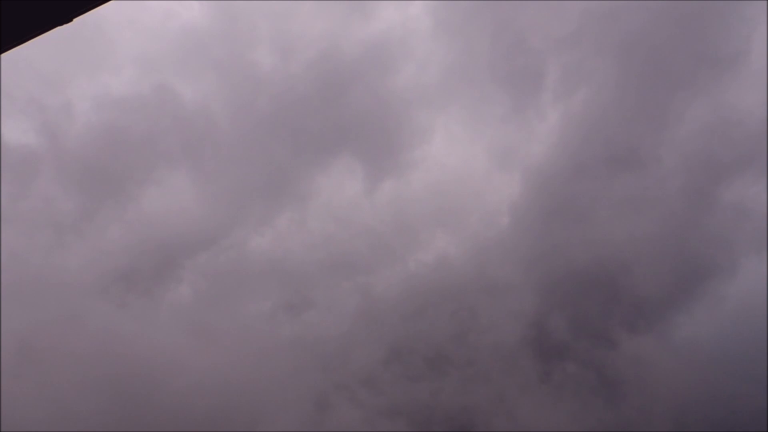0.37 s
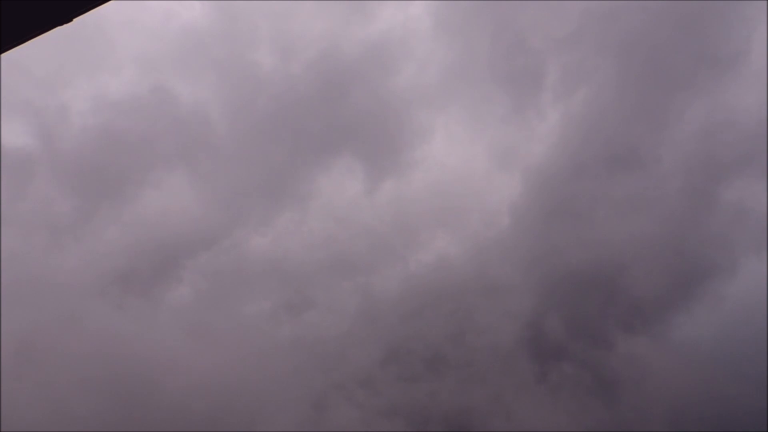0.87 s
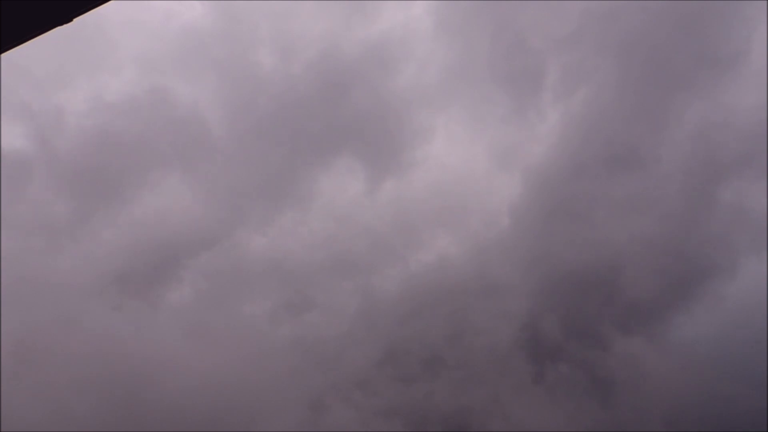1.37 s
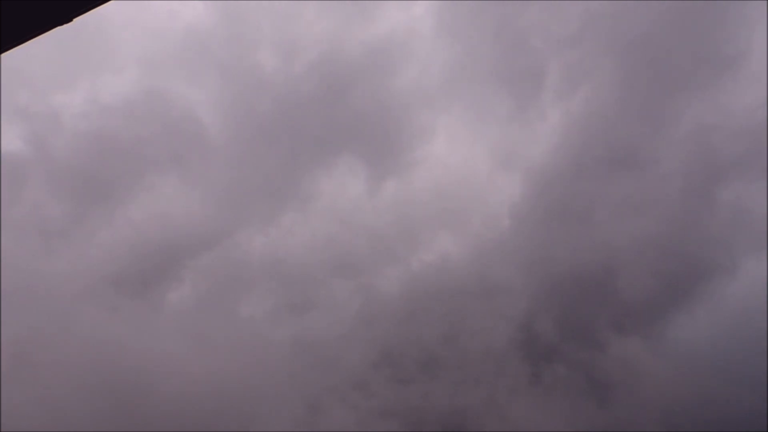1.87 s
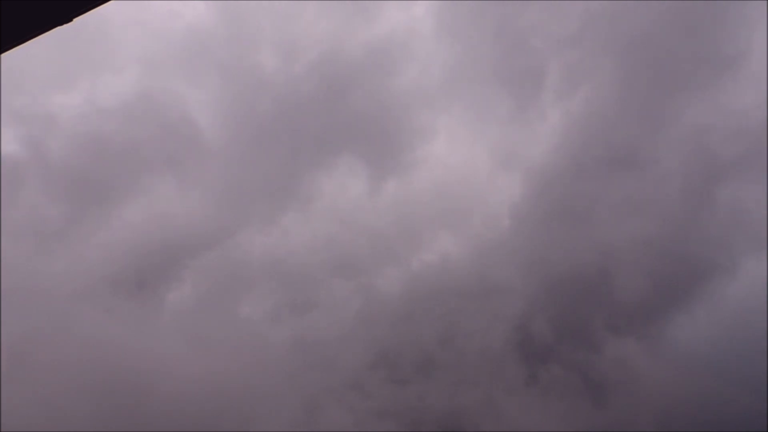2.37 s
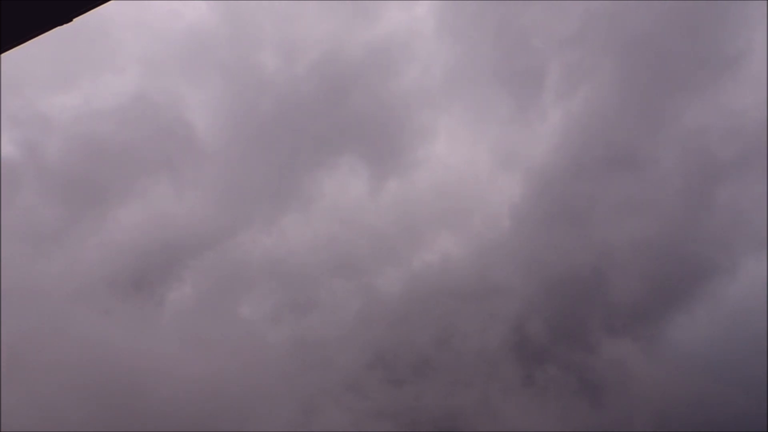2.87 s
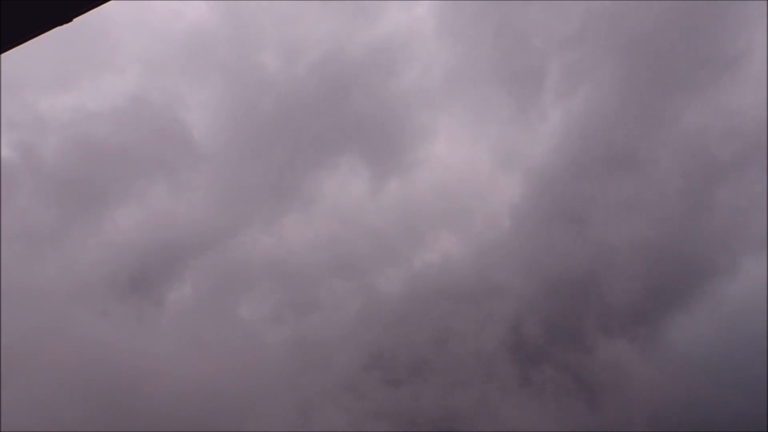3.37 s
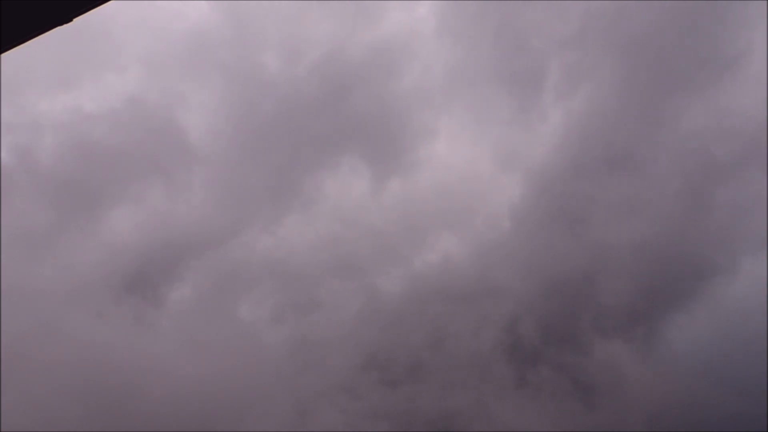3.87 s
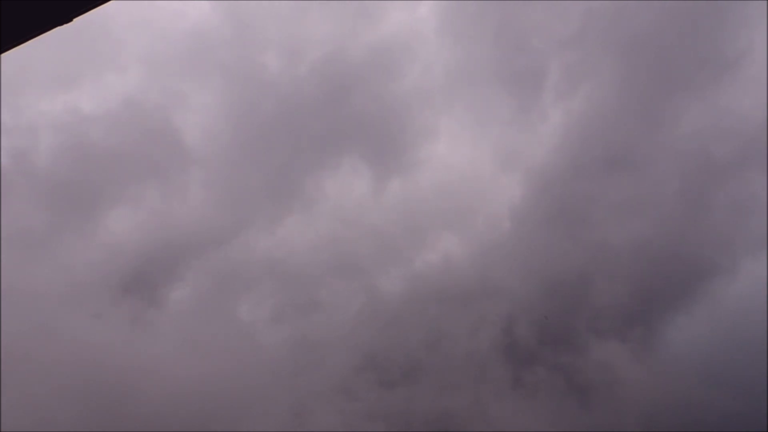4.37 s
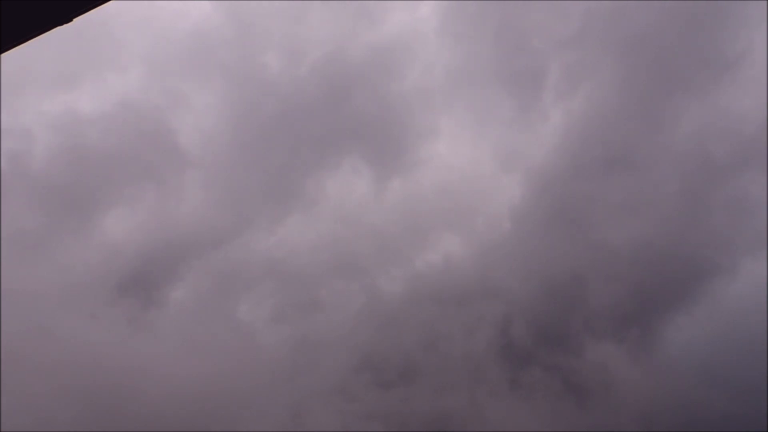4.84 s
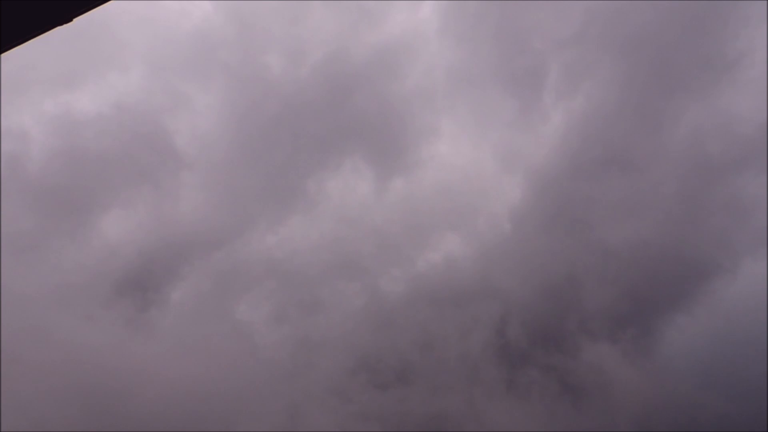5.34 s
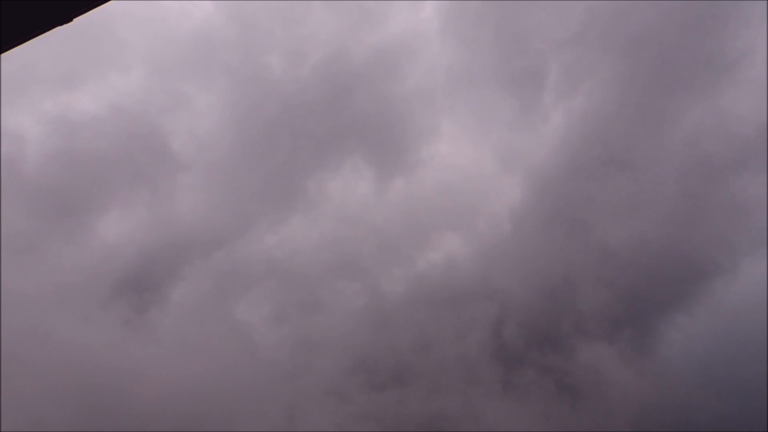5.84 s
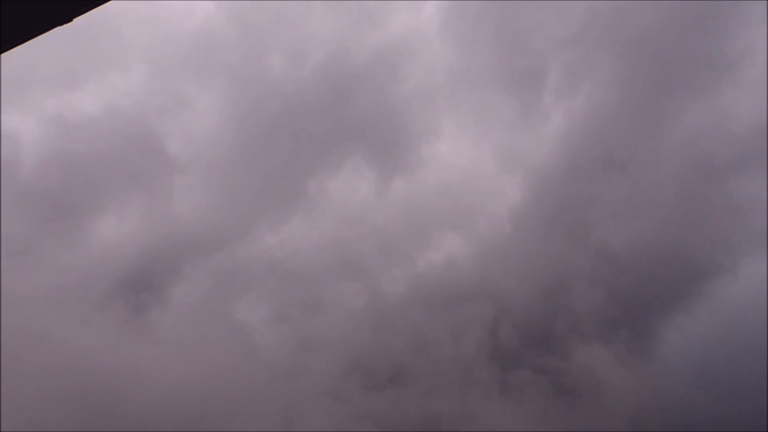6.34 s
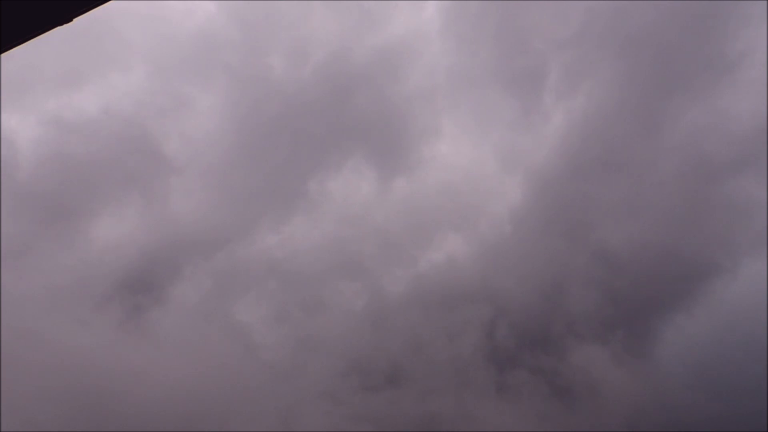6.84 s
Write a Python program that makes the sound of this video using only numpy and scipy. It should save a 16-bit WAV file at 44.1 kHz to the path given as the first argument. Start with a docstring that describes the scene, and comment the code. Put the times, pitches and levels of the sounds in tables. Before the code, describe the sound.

Outdoors in a storm, overloaded low thunder thumps and tumbles, fading and returning, over a steady rain hiss with sharp nearby drop ticks and small splashes.

```python
"""Open ground: thunder claps and rolls while rain falls steadily all around. Shock pulses from the long
lightning channel, filtered in bands, pile up into the roll; N-waves give the thumps. Banded noise, clicks and
damped resonators make the rain; single big drops tick and splash close by. The rain bed dips for a while from
0.26 s and again from 1.75 s; the loudest claps overload the recorder."""
import sys
import numpy as np
from scipy import signal
from scipy.io import wavfile
from scipy.ndimage import uniform_filter1d

SR = 44100
rng = np.random.default_rng(int(sys.argv[2]) if len(sys.argv) > 2 else 0)


def transcribe(signal):
    """Save signal, clipped to [-1, 1], as a 16-bit WAV file at the path in sys.argv[1]."""
    frames = np.atleast_2d(signal).T
    limited = np.clip(frames, -1, 1)
    pcm = np.round(limited * 32767).astype(np.int16)
    wavfile.write(sys.argv[1], SR, pcm)


def invert_db(level):
    """Linear amplitude ratio for a level in decibels (20 dB per decade), elementwise."""
    return 10 ** (np.asarray(level, dtype=float) / 20)


N = 318402

# rumble between the claps: t/s, body level/dB, boom level above body/dB, rasp level above body/dB
RUMBLE = [(0.0, -20, 3.5, -18.5), (0.2, -24.5, -13, -7), (0.3, -25, 4, -16.5), (0.6, -34, 7, -16.5),
          (0.88, -28, -2.5, -15.5), (1.02, -20, -1.5, -12.5), (1.5, -19, -3.5, -18), (1.78, -21, -4, -19),
          (2.0, -26.5, 3.5, -17), (2.55, -26, -6, -16.5), (3.3, -25, -2.5, -18.5), (4.3, -28, -5.5, -17),
          (4.85, -35, -2.5, -16.5), (5.55, -33.5, -14, -13.5), (5.75, -23, -12, -20.5), (6.2, -23, -8, -21),
          (6.55, -26, -3.5, -20), (6.78, -28.5, -3.5, -23.5), (7.0, -24, -3, -19.5), (7.22, -27.5, -7, -22)]
# claps swelling out of the rumble: t/s, body level at the top/dB, boom level above body/dB,
# full width at half power/s
CLAP_SWELLS = [(0.192, -13, 8.5, 0.077), (1.046, -20, 0, 0.049), (1.13, -14.5, -7, 0.03),
               (1.26, -20.5, 1, 0.067), (1.437, -16, -2, 0.036), (1.635, -16, 4, 0.053),
               (1.699, -12, 3, 0.038), (1.842, -18, 0.5, 0.07), (2.056, -35, 8, 0.035),
               (2.28, -25, 3, 0.064), (2.493, -18, -5, 0.094), (2.623, -21, -13, 0.074),
               (2.814, -21, -6, 0.043), (3.216, -27.5, -0.5, 0.046), (3.336, -23, -22, 0.094),
               (3.754, -28, 1, 0.11), (4.166, -32, -10, 0.04), (4.352, -26, 3, 0.055),
               (5.126, -35, 1, 0.026), (5.312, -36.5, -0.5, 0.077), (5.537, -29, -0.5, 0.055),
               (5.699, -19.5, -5, 0.026), (6.12, -20, -8, 0.15), (6.372, -26, 5.5, 0.061),
               (6.651, -20.5, 3, 0.019), (6.905, -28, -3, 0.074), (7.127, -24, 6, 0.077)]
# spectral density of the thunder, relative within each layer: f/Hz, level per hertz/dB
THUNDER_SPECTRUM = [(13, -39), (22, -3), (69, 2), (108, -2.5), (151, 2), (190, -4.5), (261, -3),
                    (385, -9.5), (459, -30.5), (568, -4), (642, -34), (808, -20), (915, -41.5),
                    (1190, -48.5), (1500, -26), (1950, -74), (3300, -120)]
# rain bed, lower for a while from 0.26 s and from 1.75 s: t/s, level/dB
RAIN_LEVEL = [(0.0, -44.5), (0.21, -42.5), (0.26, -49.5), (0.55, -50.5), (0.82, -44.5), (1.0, -40.5),
              (1.5, -36), (1.75, -44), (2.05, -47), (2.4, -38), (2.7, -39.5), (4.3, -38.5), (7.22, -39)]
# relative spectral density of the rain: f/Hz, level per hertz/dB
RAIN_SPECTRUM = [(300, -1), (800, 4), (1250, 0), (1700, 2), (2200, -0.5), (3500, -2), (6500, -3),
                 (9300, -5.5), (12000, -4.5), (13600, -8)]
# left-right correlation of the rain: f/Hz, likeness (1 = identical)
RAIN_CORRELATION = [(400, 0.11), (1000, 0.5), (2000, -0.08), (4000, -0.38), (12000, -0.063)]
# near drops: t/s, tick peak level before the crack is added/dB, tick centre f/Hz,
# spray level above the tick/dB, spray t60/s
NEAR_DROPS = [(0.085, -36, 8900, -15, 0.22), (0.4483, -36.5, 8800, -16, 0.3),
              (0.838, -41.5, 2900, -10, 0.22), (0.9185, -34.5, 2800, -13, 0.13),
              (1.089, -31, 9510, -10.5, 0.46), (1.124, -38, 6150, -4, 0.25), (1.137, -25, 8500, -22, 0.15),
              (1.1496, -21, 10100, -16, 0.33), (1.344, -28, 2910, -10, 0.21), (1.366, -25, 6510, -23, 0.22),
              (1.372, -25, 6680, -16, 0.25), (1.3805, -16, 6900, -13, 0.24), (1.4218, -19, 6690, -14, 0.16),
              (1.431, -8.5, 6550, -25, 0.29), (1.4594, -30, 6570, -22, 0.24),
              (2.4303, -25, 9300, -22, 0.62), (2.918, -16.5, 9900, -24, 0.56),
              (3.053, -22, 8450, -22, 0.33), (3.4513, -27, 6800, -21, 0.6), (3.706, -22, 9200, -16.5, 0.42),
              (3.923, -29, 4800, -18, 0.22), (3.9938, -24, 7350, -22, 0.24),
              (4.0603, -29.5, 11400, -6, 0.1), (4.0857, -17.5, 10700, -15.5, 0.2),
              (4.1238, -28.5, 6960, -12, 0.25), (4.147, -22, 7050, -20, 0.26),
              (4.1524, -27, 10700, -20, 0.56), (4.2186, -29, 6800, -11.5, 0.37),
              (4.3, -27, 6390, -25, 0.17), (4.408, -30, 11500, -11, 0.17), (4.416, -17.5, 11700, -16, 0.21),
              (4.497, -19, 9300, -22, 0.33), (4.9221, -21.5, 2950, -13.5, 0.27),
              (4.928, -17.5, 5000, -21, 0.37), (4.982, -29, 7260, -14.5, 0.22),
              (5.0838, -30, 13200, -21, 0.22), (5.1548, -14, 8100, -22, 0.12),
              (5.1751, -14, 7020, -23, 0.33), (5.2611, -31.5, 7220, -8, 0.26),
              (5.2811, -22.5, 7150, -11.5, 0.25), (5.289, -27, 3000, -12, 0.2),
              (5.294, -20, 9100, -10.5, 0.21), (5.3342, -24.5, 8100, -11.5, 0.34),
              (5.3546, -23.5, 6860, -20, 0.15), (5.493, -32.5, 4400, -6.5, 0.32),
              (5.5208, -27.5, 2920, -14.5, 0.61), (5.8293, -29.5, 3340, -6, 0.19),
              (6.089, -36, 2820, -7.5, 0.25), (6.601, -25.5, 2620, -6.5, 0.6),
              (6.608, -11, 9800, -22.5, 0.27), (6.6402, -26, 1640, -11.5, 0.46)]
# resonances of the wet surface under the spray: f/Hz, bandwidth/Hz, level/dB
SURFACE_MODES = [(1530, 570, -1), (2630, 480, 6.5), (3210, 400, 1.5), (5070, 170, 0.5)]
# N-waves standing out of the roll: t/s, peak level before dulling/dB, f/Hz (one over the duration)
N_WAVES = [(0.153, -3, 66), (0.188, -6.5, 85.6), (0.202, -4.5, 88), (0.774, -26, 147), (1.038, -16, 64),
           (1.213, -32, 83.4), (1.416, -7, 137), (1.438, -35, 167), (1.583, -7.5, 129), (1.622, 0, 67.4),
           (1.678, -3.5, 144), (1.701, -3.5, 136), (1.723, -8, 165), (1.831, -7, 81.3), (1.845, -6.5, 64.4),
           (2.208, -18, 167), (2.448, -16, 230), (2.6, -24, 173), (2.783, -8.5, 50), (5.497, -16.5, 228),
           (5.678, -14, 142), (5.701, -26, 139), (6.08, -13.5, 246), (6.104, -10, 135), (6.142, -6, 180),
           (6.337, -16, 75), (6.63, -18, 121), (7.119, -13, 101)]


def rms_one(x):
    """Normalization: scales a signal to unit root mean square."""
    return x / np.sqrt(np.mean(x ** 2) + 1e-20)


def in_time(rows):
    """Linear interpolation: each column of a table becomes a curve over time."""
    s, *columns = np.transpose(rows)
    return [np.interp(np.arange(N) / SR, s, c) for c in columns]


def at_hz(points, hz):
    """Interpolation on a logarithmic frequency axis."""
    f, value = np.transpose(points)
    return np.interp(np.log(hz), np.log(f), value)


def band(x, low, high):
    """Band-pass filtering: a Butterworth response between two frequencies in Hz."""
    return signal.sosfilt(signal.butter(2, [low, high], "band", fs=SR, output="sos"), x)


def balance(left_db):
    """Level difference: gains that make the left channel louder than the right by left_db."""
    return invert_db([[left_db / 2], [-left_db / 2]])


def clicks(per_s, spread_db, channels):
    """Random impulse process: clicks of either sign, a few of them much stronger; rms 1."""
    strength_db = spread_db * np.minimum(rng.exponential(1, (channels, N)), 4)
    sizes = invert_db(strength_db) * rng.choice([-1, 1], (channels, N))
    present = rng.random((channels, N)) < per_s / SR
    return rms_one(sizes * present + 1e-18)


def pair(mid, side, alike):
    """Interchannel correlation: mid and side are weighted to give left and right a stated likeness."""
    return np.sqrt(1 + alike) * mid + np.sqrt(1 - alike) * side * [[1], [-1]]


def roll_levels():
    """Addition of powers: each clap's bell-shaped swell joins the rumble in boom, body, rasp and edge."""
    clap_rasp_db = -3   # claps are a little less raspy than the rumble
    edge_db = -36   # the crackling edge above the rasp rides on the boom
    body_db, boom_db, rasp_db = in_time(RUMBLE)
    body, boom = invert_db(2 * body_db), invert_db(2 * (body_db + boom_db))
    swell, deep_swell = 0, 0
    for s, top_db, deep_db, length in CLAP_SWELLS:
        bell = invert_db(2 * top_db) * .5 ** ((2 * (np.arange(N) / SR - s) / length) ** 2)
        swell = swell + bell
        deep_swell = deep_swell + invert_db(2 * deep_db) * bell
    boom_power = boom + deep_swell
    rasp_power = invert_db(2 * rasp_db) * (body + invert_db(2 * clap_rasp_db) * swell)
    return np.sqrt([boom_power, body + swell, rasp_power, invert_db(2 * edge_db) * boom_power])


def evened(x, seconds, share):
    """Envelope compression: part of the chance swells is taken out, so that the surges keep their shape."""
    power = uniform_filter1d(np.mean(x ** 2, axis=0), round(seconds * SR)) + 1e-12
    return rms_one(x / power ** (share / 2))


def thunder():
    """Superposition of shocks from the channel's bends, nearly alike at both ears, coloured by long air paths."""
    shocks = clicks(per_s=500, spread_db=2, channels=2)
    edges = 21 * 2 ** np.arange(0, 6.2, 1 / 4)   # quarter-octave bands
    layers = np.zeros((4, 2, N))   # boom, body, rasp, edge
    for k, (low, high) in enumerate(zip(edges, edges[1:])):
        hz = np.sqrt(low * high)
        # neighbouring bands come by different paths
        scattered = np.roll(shocks, (k % 2) * N // 2, axis=1)
        mid, side = band(scattered, low, high)
        layer = int(hz > 120) + int(hz > 450) + int(hz > 880)
        layers[layer] += invert_db(at_hz(THUNDER_SPECTRUM, hz)) * pair(mid, side, 0.98)
    roll = 0
    for gain, layer in zip(roll_levels(), layers):
        roll = roll + gain * evened(layer, seconds=0.0335, share=0.35)
    roll[0] = np.roll(roll[0], 4)   # samples; the right port lies a little nearer to the storm
    return roll * balance(left_db=1.4)


def drift(rate):
    """Low-pass filtered noise: slow chance through two one-pole stages with corners at rate/Hz; spread 1."""
    r = np.exp(-80 * np.pi * rate / SR)   # one coarse step is 40 samples
    coarse = rng.standard_normal(N // 40 + 2002)
    slow = signal.lfilter([1], [1, -2 * r, r * r], coarse)[2000:]   # run-in discarded
    return np.interp(np.arange(N) / 40, np.arange(len(slow)), rms_one(slow))


def plinks(per_s, cycles):
    """Damped resonance: drops in puddles ring down 60 dB in a few cycles at scattered middle pitches; rms 1."""
    out = 0
    for hz in np.geomspace(1300, 2200, 8):
        r, w = invert_db(-60 * hz / (cycles * SR)), 2 * np.pi * hz / SR
        impacts = clicks(per_s / 8, 6.2, channels=2)
        out = out + signal.lfilter([0, np.sin(w)], [1, -2 * r * np.cos(w), r * r], impacts)
    return rms_one(out)


def rain(patchy_db, patter_db):
    """Incoherent summation: far drops merge into hiss, while nearer ones patter and plink on top."""
    patter = invert_db(patter_db) * clicks(900, 7.8, channels=2)
    source = rng.standard_normal((2, 2, N)) + patter
    together, bed = drift(2.3), 0
    edges = 300 * 2 ** np.arange(0, 5.8, 1 / 3)   # third-octave bands
    for k, (low, high) in enumerate(zip(edges, edges[1:])):
        hz = np.sqrt(low * high)
        mid, side = band(source[k % 2], low, high)
        flutter_db = patchy_db * (together + 2.8 * drift(36))   # shared and separate level changes
        gain = invert_db(at_hz(RAIN_SPECTRUM, hz) + flutter_db)
        bed = bed + gain * pair(mid, side, at_hz(RAIN_CORRELATION, hz))
    mixed = rms_one(bed) + invert_db(-18.5) * plinks(per_s=150, cycles=18)
    return invert_db(in_time(RAIN_LEVEL)[0]) * mixed * balance(left_db=1)


def resonant(x):
    """Modal filtering: the wet surface lends the duller spray its few broad resonances."""
    out = invert_db(-3) * band(x, 1130, 5300)
    for k, (hz, width, level_db) in enumerate(SURFACE_MODES):
        r = np.exp(-np.pi * width / SR)
        top = (1 - r * r) / 2 * invert_db(level_db) * (-1) ** k   # alternate modes in opposite phase
        poles = [1, -2 * r * np.cos(2 * np.pi * hz / SR), r * r]
        out = out + signal.lfilter([top, 0, -top], poles, x)
    return rms_one(out)


def drop_tick(blow, t, hz, lead_s, tick_t60_s, width):
    """Impact excitation: a short noise burst near the drop's pitch, a slap around it and a bare click."""
    shape = np.exp(np.minimum(t, 0) / lead_s) * invert_db(-60 * np.maximum(t, 0) / tick_t60_s)
    tick = band(blow * shape, hz / width, min(hz * width, 16000))
    tick += invert_db(-5.5) * band(blow[::-1] * shape ** 2, hz / 1.02, min(hz * 1.76, 16000))   # slap
    tick /= np.max(np.abs(tick))
    crack = band((t == 0) + 1e-18, hz / 2.4, min(hz * 1.6, 16000))
    return tick + crack / np.max(np.abs(crack))   # equal peaks


def spray_hiss(low, high, after, hz):
    """Granular noise: dull resonant and fine bright spray, part of which rings on at the tick's pitch."""
    octaves = np.log2(hz / 6000)
    bright_db = 6 + octaves   # fine over dull; higher ticks throw finer spray
    linger_db = -6 - 1.5 * octaves   # low ticks linger most
    fine_hz = max(hz, 5000)
    fine = rms_one(band(high, fine_hz / 1.87, min(fine_hz * 2.0, 15000)))
    fine = fine * invert_db(-70 * after)   # the finest spray settles first
    linger = rms_one(band(low[::-1], hz / 1.035, hz * 1.035))
    return invert_db(-bright_db / 2) * resonant(low) + invert_db(bright_db / 2) * fine + invert_db(linger_db) * linger


def drops(lead_s, tick_t60_s, width, swell_s, fallback_s, fallback_db):
    """Impact and delayed return: a big drop ticks amid spray, and thrown-up droplets land a moment later."""
    out, size, lead = np.zeros((2, N + SR)), SR // 2, SR // 20
    t = (np.arange(size) - lead) / SR
    after = np.maximum(t, 0)
    fallback = invert_db(fallback_db) * np.exp(-((t - fallback_s) / 0.0097) ** 2)
    count = len(NEAR_DROPS)
    grain_db = 5.5 * rng.standard_normal((count, 3, 1, size))   # uneven grain strengths
    grains = rng.standard_normal((count, 3, 2, size)) * invert_db(grain_db)
    for (s, peak_db, hz, spray_db, t60), (blow, low, high) in zip(NEAR_DROPS, grains):
        tick = drop_tick(blow, t, hz, lead_s, tick_t60_s, width)
        # the first droplets land ahead of the blow
        spread = np.exp(np.minimum(t, 0) / swell_s) * invert_db(-60 * after / t60)
        splash = invert_db(spray_db) * (spread + fallback) * spray_hiss(low, high, after, hz)
        at = round(s * SR) - lead
        out[:, at:at + size] += invert_db(peak_db) * (tick + splash)
    return out[:, :N] * balance(left_db=0.9)


def thumps(edge_hz):
    """N-wave: a near-broadside stretch of the channel arrives as one pressure pulse, its edges dulled by air."""
    out = np.zeros(N + SR)
    for s, peak_db, hz in N_WAVES:
        size = round(SR / hz)
        at = round(s * SR)
        out[at:at + size] += invert_db(peak_db) * np.linspace(1, -1, size)
    low_pass = signal.butter(4, edge_hz, fs=SR, output="sos")
    dulled = signal.sosfilt(low_pass, out[:N] + 1e-18)
    return dulled * balance(left_db=1.4)


def scene():
    """Linear superposition of thunder, rain bed, near drops and thumps."""
    roll = thunder()
    bed = rain(patchy_db=0.59, patter_db=-7)
    near = drops(lead_s=0.00047, tick_t60_s=0.019, width=1.09,
                 swell_s=0.0063, fallback_s=0.0426, fallback_db=-22)
    return roll + bed + near + thumps(edge_hz=400)


def top_cut(x):
    """Nothing passes above the cut-off."""
    return signal.sosfilt(signal.butter(12, 15470, fs=SR, output="sos"), x)


def record(dry):
    """Band limiting and overload: the microphone drops the deepest bass, peaks are cut flat, the top is cut off."""
    picked = []
    for hz, port in zip((37, 39.6), dry):   # the two ports lose the deepest bass unequally
        picked.append(signal.sosfilt(signal.butter(2, hz, "high", fs=SR, output="sos"), port))
    flat = np.clip(picked, -.96, .96)
    low_pass = signal.ellip(10, .3, 46, 14250, fs=SR, output="sos")   # ripple/dB, rejection/dB, f/Hz
    return top_cut(signal.sosfilt(low_pass, flat))


dry = scene()
out = record(dry)
transcribe(out)
```